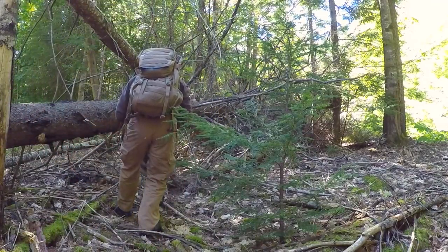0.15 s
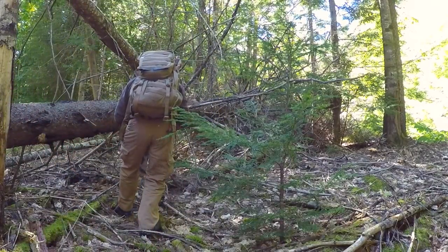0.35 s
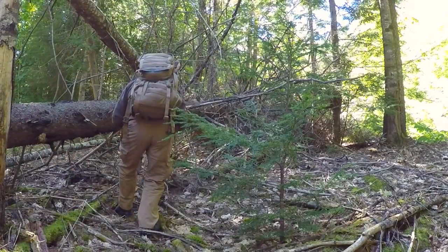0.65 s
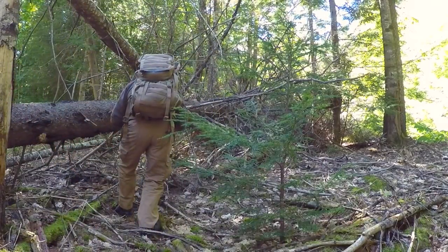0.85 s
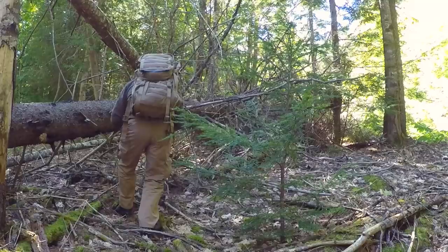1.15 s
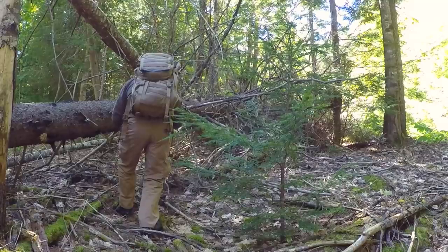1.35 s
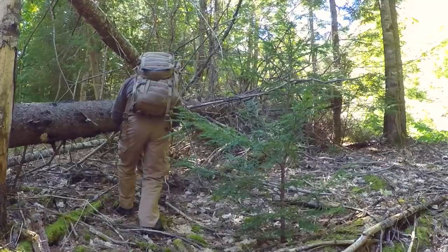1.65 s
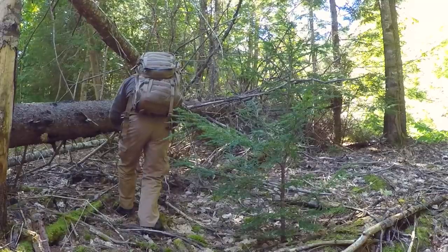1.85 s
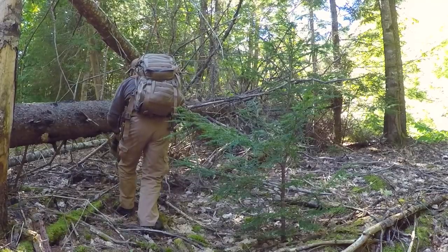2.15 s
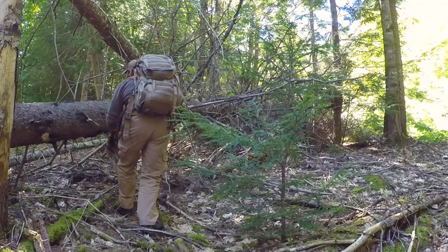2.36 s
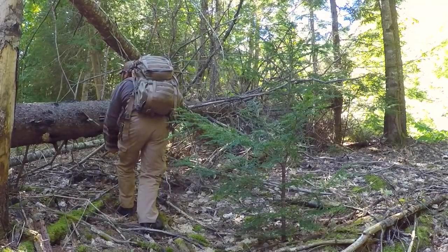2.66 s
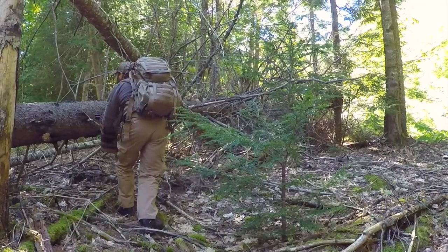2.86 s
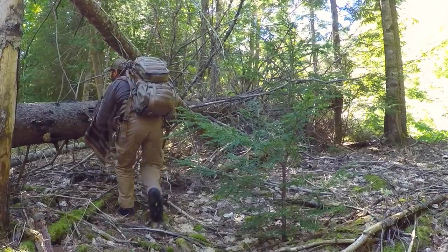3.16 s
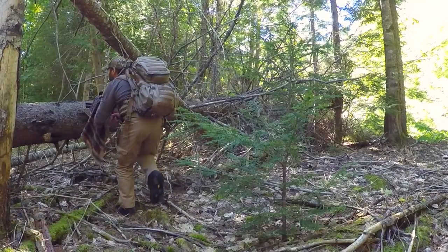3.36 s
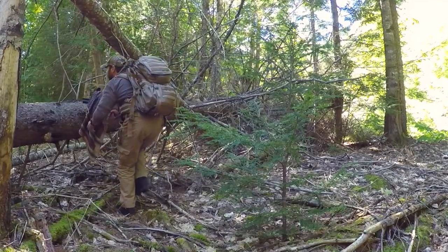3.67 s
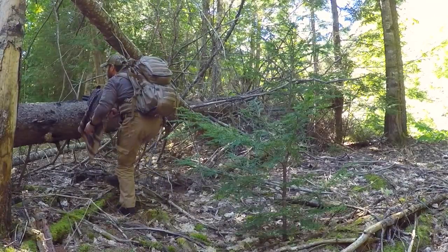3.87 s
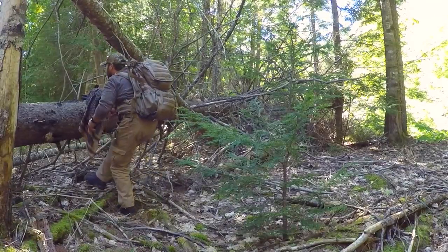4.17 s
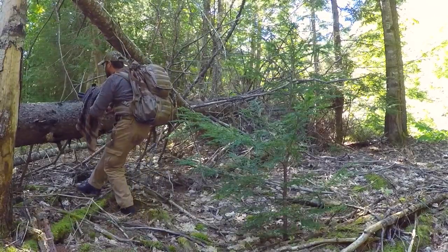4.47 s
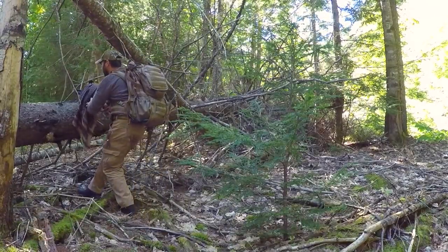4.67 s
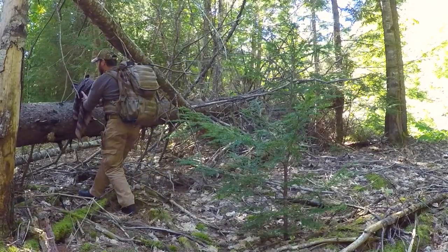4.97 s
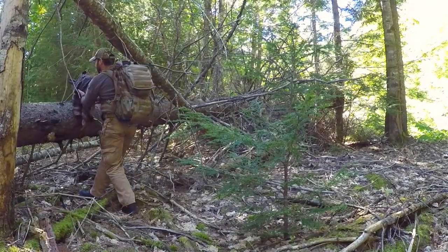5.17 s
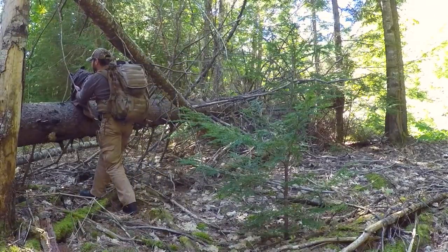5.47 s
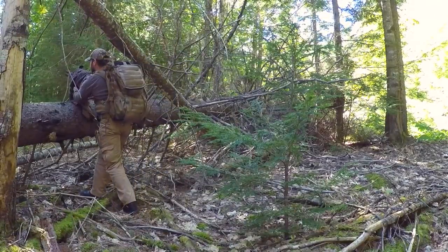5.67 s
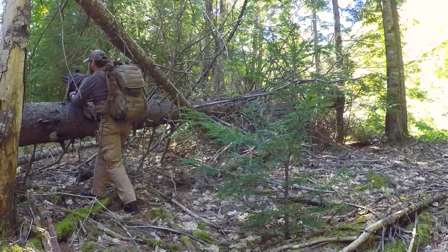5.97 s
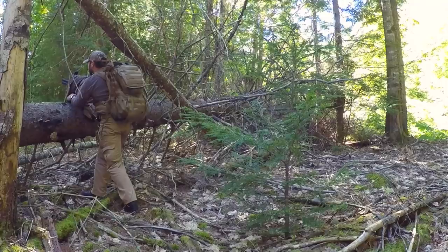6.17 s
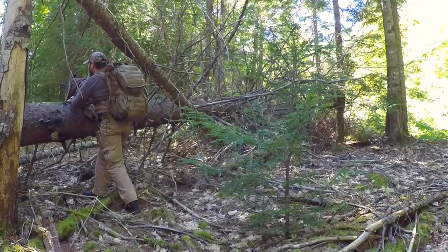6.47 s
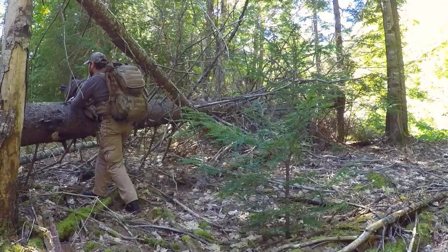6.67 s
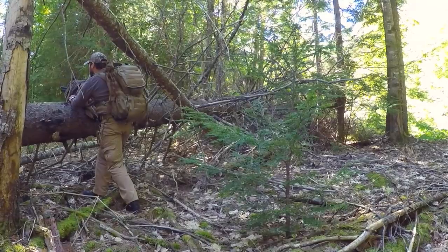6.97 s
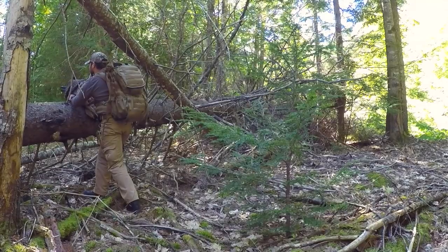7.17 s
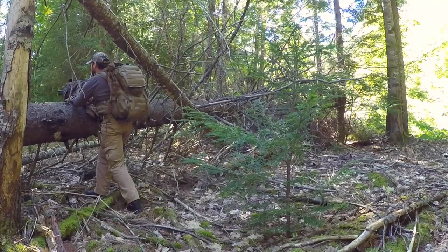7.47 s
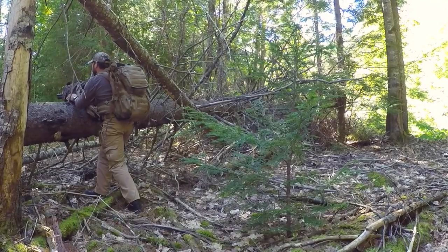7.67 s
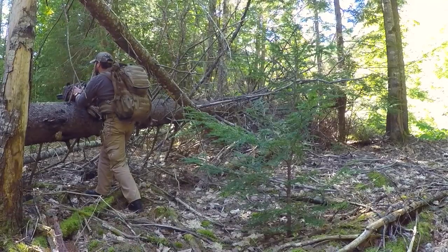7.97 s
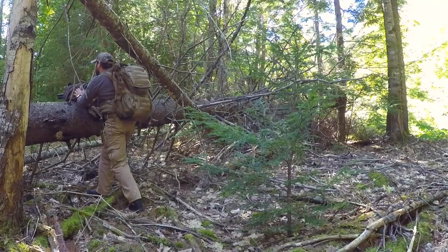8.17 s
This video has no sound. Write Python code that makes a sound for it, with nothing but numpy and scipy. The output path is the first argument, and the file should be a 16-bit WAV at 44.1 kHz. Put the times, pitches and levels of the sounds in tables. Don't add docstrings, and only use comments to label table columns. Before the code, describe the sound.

A walker with a pack shifts over dry litter a few metres from the microphone. Creaking wood knocks and crunching come first, then a sharp stick crack, a quieter pause and another step with a break. Dense twig snapping builds to one very loud crack just before five seconds, then thins to isolated snaps. Trunks return a short scattered echo, with faint wind and a barely audible distant low hum beneath.

```python
import sys
import numpy as np
from scipy import signal
from scipy.fft import rfft, irfft
from scipy.io import wavfile

SR = 44100
rng = np.random.default_rng(int(sys.argv[2]) if len(sys.argv) > 2 else 0)


def waveform_to_disk(signal):
    frames = np.transpose(np.atleast_2d(signal))
    scaled = np.clip(frames, -1, 1) * 32767
    samples = np.round(scaled).astype(np.int16)
    wavfile.write(sys.argv[1], SR, samples)


def convert_level_to_amplitude(level_db):
    exponent = np.asarray(level_db, float) / 20
    return 10 ** exponent


N = 366912


def rms_one(x):
    return x / np.sqrt(np.mean(x ** 2) + 1e-20)


def peak_one(x):
    return x / np.max(np.abs(x))


def band(x, low_hz, high_hz):
    sos = signal.butter(2, [low_hz, min(high_hz, .45 * SR)], "band", fs=SR, output="sos")
    return signal.sosfilt(sos, x)


def ring(x, hz, t60):
    r, w = convert_level_to_amplitude(-60 / (t60 * SR)), 2 * np.pi * hz / SR
    return signal.lfilter([0, np.sin(w)], [1, -2 * r * np.cos(w), r * r], x)


def resonate(x, hz, width_hz):
    r = np.exp(-np.pi * width_hz / SR)
    gain = (1 - r * r) / 2
    return signal.lfilter([gain, 0, -gain], [1, -2 * r * np.cos(2 * np.pi * hz / SR), r * r], x)


def drift(rate_hz):
    r = np.exp(-2 * np.pi * rate_hz * 40 / SR)
    slow = signal.lfilter([1], [1, -2 * r, r * r], rng.standard_normal(N // 40 + 2002))
    slow = slow[2000:]
    return np.interp(np.arange(N) / 40, np.arange(len(slow)), rms_one(slow))


def add(out, sound, s):
    at = max(round(s * SR), 0)
    out[at:at + len(sound)] += sound[:N - at]


def uneven(shape, spread_db):
    size_db = spread_db * np.minimum(rng.exponential(1, shape), 5)
    return convert_level_to_amplitude(size_db) * rng.choice([-1, 1], shape)


def forest_air(patchy_db):
    # f/Hz, level per Hz/dB
    colour = [(12, -30), (20, -3), (49, 4), (64, -12.5), (87, -8), (143, -21), (379, -21.5), (487, -16.5),
              (544, -17), (1030, -17), (2300, -24.5), (2800, -19), (3040, -24.5), (15200, -40.5)]
    at_hz, level_db = np.transpose(colour)
    edges = 17 * 2 ** np.arange(0, 10.1, .5)
    white = rng.standard_normal((2, N + SR))
    out = 0
    for k, (low, high) in enumerate(zip(edges, edges[1:])):
        colour_db = np.interp(np.log(low * high) / 2, np.log(at_hz), level_db)
        out = out + convert_level_to_amplitude(colour_db + patchy_db * drift(1.3)) * band(white[k % 2], low, high)[SR:]
    return convert_level_to_amplitude(-58.5) * rms_one(out)


def drone():
    hz, width_hz, level_db = 43.5, 6.3, -69.5
    hum = ring(rng.standard_normal(N + SR), hz, 2.9 / width_hz)
    return convert_level_to_amplitude(level_db) * rms_one(hum[SR:])


def canopy():
    hz, width_hz, level_db = 2750, 358, -77.5
    once = resonate(rng.standard_normal(N), hz, width_hz)
    return convert_level_to_amplitude(level_db) * rms_one(resonate(once, hz, width_hz))


def rubs():
    # t/s, length/s, level/dB, f at start/Hz, f at end/Hz, width/Hz
    strokes = [
        (3.08, 0.075, -57.5, 950, 1330, 150),
        (3.112, 0.096, -54, 610, 932, 230),
        (3.12, 0.1, -55, 3200, 3200, 1400),
        (3.673, .06, -63, 3250, 2700, 600),
        (3.64, 0.17, -61.5, 2900, 2000, 2100),
    ]
    out = np.zeros(N)
    for s, length, level_db, from_hz, to_hz, width_hz in strokes:
        count = round(length * SR)
        low_pass = signal.butter(2, width_hz / 2, fs=SR, output="sos")
        rough = signal.sosfilt(low_pass, rng.standard_normal((2, 9000)))[:, -count:]
        phase = 2 * np.pi * np.cumsum(np.linspace(from_hz, to_hz, count)) / SR
        rub = rough[0] * np.sin(phase) + rough[1] * np.cos(phase)
        add(out, convert_level_to_amplitude(level_db) * np.hanning(count) * rms_one(rub), s)
    return out


def thumps():
    # t/s, peak level/dB, f/Hz
    thuds = [(0.025, -50, 133), (1.601, -34, 350), (1.609, -49, 86), (3.034, -66, 260),
             (3.314, -50, 81.5), (3.343, -54.5, 125), (4.349, -54, 61), (4.625, -47, 111),
             (4.83, -40, 124), (4.861, -43.5, 67.3), (5.368, -45.5, 240), (5.374, -55, 61.9),
             (5.892, -63, 252), (6.331, -70, 62)]
    out, t = np.zeros(N), np.arange(4000) / SR
    for s, peak_db, hz in thuds:
        push = np.sin(2 * np.pi * hz * t) * t * np.exp(-t * hz / .6)
        add(out, convert_level_to_amplitude(peak_db) * peak_one(push), s)
    return out


def grains(per_s, low_hz, high_hz, cycles, spread_db):
    clicks = uneven(N, spread_db) * (rng.random(N) < per_s * convert_level_to_amplitude(3 * drift(25)) / SR)
    dealt = rng.integers(0, 14, N)
    pitches = np.geomspace(low_hz, high_hz, 14)
    return rms_one(sum(ring(clicks * (dealt == k) + 1e-18, hz, cycles / hz)
                       for k, hz in enumerate(pitches)))


def needles():
    chance = 422 * convert_level_to_amplitude(4 * drift(12)) / SR
    clicks = uneven(N, spread_db=3.2) * (rng.random(N) < chance) + 1e-18
    bright = band(band(clicks, 8400, 12500), 7500, 13000)
    return rms_one(bright + .3 * band(clicks, 2500, 6500))


def litter():
    # t/s, stir level/dB, weight level/dB
    boot = [(0.0, 11.5, 6), (0.48, 0, -0.5), (1.3, -2, -1), (1.9, 3, 0), (2.08, 6, 1.5), (2.51, -1, -0.5),
            (2.75, 4.5, 1.5), (3.0, 11.5, 10), (3.15, 16, 4.5), (3.36, 2.5, 2), (4.0, -0.5, 2.5),
            (4.154, 7.5, 4.5), (4.8, 16.5, 4.5), (5.0, 5, 0.5), (5.53, 6, -1.5), (6.2, -1, -0.5),
            (7.81, 0.5, -1), (8.32, 5, 1)]
    s, *controls = np.transpose(boot)
    stir_db, weight_db = [np.interp(np.arange(N) / SR, s, db) for db in controls]
    fine_db = 1.36 * stir_db
    crunch = grains(1500, 400, 1400, cycles=4.0, spread_db=3.0)
    rustle = grains(3000, 1720, 5510, cycles=5.7, spread_db=3.5)
    hiss = grains(4000, 6000, 14500, cycles=3.8, spread_db=3.0)
    return (convert_level_to_amplitude(weight_db - 66.5) * crunch + convert_level_to_amplitude(stir_db - 70) * rustle
            + convert_level_to_amplitude(fine_db - 83) * hiss + convert_level_to_amplitude(fine_db - 89.5) * needles())


def ticks():
    # t/s, peak level/dB
    brittle_specks = [(0.077, -42), (0.177, -49), (0.3083, -38), (0.3606, -39), (2.3087, -48),
                      (2.7294, -53), (2.959, -45), (3.0327, -36), (3.165, -41), (3.2587, -46),
                      (4.1885, -42), (4.325, -48), (4.541, -42), (4.581, -43), (4.6356, -37), (4.7444, -46),
                      (5.316, -44), (5.5543, -40), (2.8055, -56), (0.4663, -43), (7.893, -52), (0.416, -46)]
    # t/s, peak level/dB
    glassy_specks = [(0.118, -48), (2.887, -52), (4.2177, -33.5), (4.344, -51), (4.388, -32.5),
                     (4.5052, -47), (4.5194, -45), (4.5564, -39), (4.625, -38), (4.719, -50), (4.7556, -44),
                     (4.7694, -44), (4.788, -42), (5.0594, -49), (5.207, -50), (5.54, -54), (5.6126, -52),
                     (5.6374, -50), (5.6481, -46), (5.7194, -50), (5.7324, -49), (6.0611, -53),
                     (7.991, -54), (8.039, -54), (8.076, -51)]
    rows = [(*row, 5486) for row in brittle_specks] + [(*row, 10800) for row in glassy_specks]
    out, t = np.zeros(N), np.arange(400) / SR
    specks = rng.standard_normal((len(rows), len(t) + 1))
    for (s, peak_db, hz), (size, *speck) in zip(rows, specks):
        hz = hz * np.exp(0.0807 * size)
        tick = band(speck * np.exp(-t / .0008), .75 * hz, 1.3 * hz)
        add(out, convert_level_to_amplitude(peak_db - 2) * peak_one(tick), s + .0005)
    return out


def creaks():
    # t/s, peak level/dB, ring f/Hz
    knocks = [(0.024, -37, 1000), (0.03, -33.5, 860), (0.035, -43, 490), (0.05, -46, 1020),
              (0.068, -41.5, 1060), (0.093, -46, 1050), (0.116, -42, 1190), (0.137, -48, 900),
              (0.165, -40.5, 1040), (0.194, -43, 1020), (0.227, -44.5, 900), (0.284, -39, 1000),
              (0.321, -44.5, 710), (0.349, -47, 1080), (0.388, -36, 764), (0.433, -41.5, 985),
              (0.477, -41.5, 1000), (0.576, -43, 915), (2.704, -49, 576), (2.765, -49, 645),
              (4.152, -48, 770), (4.788, -39, 1250), (5.04, -42, 1350), (5.155, -42.5, 877),
              (5.184, -44, 860), (5.207, -34, 840), (5.218, -38, 820), (5.341, -48, 990), (7.638, -51, 990),
              (7.989, -52.5, 520)]
    out, t = np.zeros(N), np.arange(2600) / SR
    scratches = rng.standard_normal((len(knocks), len(t))) * np.exp(-t / 0.001)
    for (s, peak_db, hz), scratch in zip(knocks, scratches):
        swell = (1 - np.exp(-t / 0.00079)) * convert_level_to_amplitude(-60 * t * hz / 7.9)
        knock = peak_one(np.sin(2 * np.pi * hz * t) * swell)
        above = peak_one(band(band(scratch, 1.3 * hz, 4 * hz), hz, 3.9 * hz))
        add(out, convert_level_to_amplitude(peak_db) * (knock + 0.6 * above), s)
    return out


def twig(volley, hz, thud_db, splinter_db, ringing):
    modes = peak_one(ring(volley[0], hz, 11.0 / hz)) + 1.53 * peak_one(ring(volley[2], 1.82 * hz, 2.4 / hz))
    low_body = peak_one(band(volley[0], .6 * hz, 3500 + .3 * hz))
    high_body = peak_one(band(volley[1], 3500, 7000))
    wood = ringing * modes + 1.07 * (low_body + .8 * high_body)
    thud = peak_one(band(volley[1], 331, 1600))
    splinters = peak_one(band(volley[2], 5000, 10660))
    return convert_level_to_amplitude(-7.0) * wood + convert_level_to_amplitude(thud_db + 9) * thud + convert_level_to_amplitude(splinter_db + 6) * splinters


def same_energy(click, sound):
    return click * np.sqrt(np.sum(sound ** 2) / np.sum(click ** 2))


def snaps():
    # t/s, peak level/dB, wood f/Hz, splinter level re peak/dB
    trodden = [(0.017, -37.5, 2680, -10), (2.0185, -42.5, 1440, -10), (2.2869, -45, 1470, -11),
               (4.0951, -44.5, 4410, -39), (4.2173, -31, 1310, -37), (4.3157, -35, 1650, -16),
               (4.3255, -41.5, 2070, -23), (4.3424, -46, 2000, -9), (4.4106, -36, 1590, -27.5),
               (4.5183, -43, 1470, -6.5), (4.6249, -30.5, 3000, -7), (4.6655, -39, 1920, -10.5),
               (5.0815, -41, 1510, -20), (5.2723, -37.5, 1480, -10.5), (5.3651, -26, 3030, -9.5),
               (5.5214, -36.5, 1600, -13), (6.337, -33.5, 2760, -21), (8.1975, -37.5, 1770, -25),
               (8.2609, -38, 1510, -15)]
    # t/s, peak level/dB, wood f/Hz, splinter level re peak/dB
    hanging = [(2.6464, -46, 2290, -10), (2.8875, -44, 2650, -17), (3.2949, -39, 3270, -16),
               (4.3888, -45, 1690, 0), (4.441, -34.5, 1600, -14), (4.5052, -42, 4630, -24.5),
               (4.577, -33.5, 2700, -5), (5.11, -38, 1760, -3.5), (5.3175, -42, 1420, -36),
               (5.379, -32.5, 1640, -22), (5.469, -48, 2420, -11), (5.5709, -31, 2470, -29),
               (5.6932, -29.5, 1450, -19), (5.9556, -30, 2970, -15), (6.8992, -47, 2890, -12),
               (7.453, -43, 2070, -14), (7.8725, -39, 1450, -23), (8.1662, -42, 1400, -24)]
    # t/s, peak level/dB, wood f/Hz, splinter level re peak/dB
    brittle = [(0.3075, -29.5, 3640, -14), (0.3612, -37, 4200, -18), (0.4656, -34.5, 4200, -23),
               (2.0467, -37.5, 2860, -18), (2.15, -38.5, 1820, -22), (4.118, -37.5, 3600, -11),
               (4.4778, -28, 1950, -18), (4.8108, -29.5, 3370, -12)]
    rows = ([(*row, -15.5, 1.75) for row in trodden]
            + [(*row, -30, 1.29) for row in hanging]
            + [(*row, -36, 0.32) for row in brittle])
    near, far, t = np.zeros(N), np.zeros(N), np.arange(1400) / SR
    fibres = uneven((len(rows), 3, len(t)), spread_db=6.0)
    crack = np.tile(np.arange(len(t)) == 12, (3, 1)) * 1.
    for (s, peak_db, hz, splinter_db, thud_db, tear_ms), parting in zip(rows, fibres):
        tear = parting * np.exp(-t * 1000 / tear_ms) * (1 - np.exp(-t / 0.0006))
        sound = twig(tear + 9.5 * crack, hz, thud_db, splinter_db, 0.99)
        click = twig(crack, hz, thud_db, splinter_db, 0.14)
        add(near, convert_level_to_amplitude(peak_db) * sound, s + 0.00054)
        add(far, convert_level_to_amplitude(peak_db) * same_energy(click, sound), s + .0005)
    return near, far


def breaks():
    # t/s, peak level/dB, tearing time/ms, share of first crack, echo level/dB
    thick_breaks = [
        (1.6004, -13.5, .3, 12, -4),
        (3.0331, -22.5, 1.6, 5.6, -1),
        (4.826, -2, 1.32, 3.6, 4.5),
        (5.8919, -19, 1.9, 4.2, 2.5),
    ]
    # f/Hz, width/Hz, level/dB
    stick_modes = [
        [(515, 100, 6), (1380, 530, 5), (2760, 440, 7.5), (6500, 260, -10), (8650, 760, -17),
         (11800, 1800, -7.5)],
        [(458, 89, 6), (1730, 1700, 0.5), (5500, 250, -12), (7600, 340, -30), (9500, 340, -7),
         (12800, 580, -7.5)],
        [(180, 460, -16), (643, 230, -6.5), (1660, 195, 4.5), (3230, 590, -1), (4640, 630, -5),
         (5925, 770, -6.5), (9000, 610, -7.5), (10950, 2900, -14), (13200, 1200, -19.5)],
        [(300, 310, -4.5), (746, 230, 0), (1650, 360, 1), (2370, 160, 2), (3120, 230, 3.5), (4640, 380, -2),
         (6060, 380, -1.5), (9800, 2000, -4), (12100, 2100, -2)],
    ]
    near, far, t = np.zeros(N), np.zeros(N), np.arange(1400) / SR
    fibres = uneven((len(thick_breaks), len(t)), spread_db=6.0)
    crack = (t == 0) * 1.
    for (s, peak_db, tear_ms, first, echo_db), modes, parting in zip(thick_breaks, stick_modes, fibres):
        volley = parting * np.exp(-t * 1000 / tear_ms) + first * 3 * crack
        sound = peak_one(sum((-1) ** k * convert_level_to_amplitude(db) * np.sqrt(w) * rms_one(resonate(volley, hz, 1.08 * w))
                             for k, (hz, w, db) in enumerate(modes)))
        click = sum(convert_level_to_amplitude(db) * np.sqrt(w / hz) * resonate(crack, hz, 2.0 * hz) for hz, w, db in modes)
        add(near, convert_level_to_amplitude(peak_db) * sound, s)
        add(far, convert_level_to_amplitude(peak_db + echo_db) * same_energy(click, sound), s)
    return near, far


def off_ground(x):
    lag = round(.0056 * SR)
    return x + convert_level_to_amplitude(-21.5) * np.concatenate([np.zeros(lag), x[:-lag]])


def off_trunks(x):
    # f/Hz, level/dB, time to fall 60 dB/s
    trunks = [(282.8, -32.5, 0.33), (1000, -30, 0.77), (2190, -24, 0.36), (4200, -19, 0.46),
              (7500, -23, 0.25), (12920, -14.5, 0.19)]
    t = np.arange(SR // 2) / SR
    clumps = (1 - np.exp(-t / 0.00089)) * convert_level_to_amplitude(1.7 * drift(60)[:len(t)])
    echoes = uneven((len(trunks), len(t)), spread_db=4.0) * clumps
    brush = convert_level_to_amplitude(11 - 60 * t / 0.032)
    haze = 0
    for (hz, level_db, t60), echo in zip(trunks, echoes):
        fall = convert_level_to_amplitude(-60 * (t / t60) ** 1.014)
        long_tail = convert_level_to_amplitude(-41.0 - 60 * t / (4.6 * t60))
        colour = rms_one(band(echo, hz / 1.66, hz * 1.48))
        haze = haze + (brush + fall + long_tail) * convert_level_to_amplitude(level_db - 30.0) * colour
    return signal.fftconvolve(x, haze)[:N]


def scene():
    near, far = np.add(snaps(), breaks())
    small = creaks() + ticks() + thumps() + rubs() + litter()
    walker = off_ground(near + small) + off_trunks(far + small)
    walker = band(walker, 20, 14200)
    shadow = 0.36 * resonate(walker, 7600, 1700)
    return (walker - shadow + forest_air(patchy_db=0.5) + drone() + canopy())[None]


def roll_off(x):
    return signal.sosfilt(signal.butter(12, 16570, fs=SR, output="sos"), x)


def record(dry):
    hz = np.fft.rfftfreq(N, 1 / SR)
    top_db = np.interp(hz, [15250, 15450], [0, -26])
    dull = irfft(rfft(dry) * convert_level_to_amplitude(top_db), N)
    return roll_off(dull)


dry = scene()
out = record(dry)
waveform_to_disk(out)
```